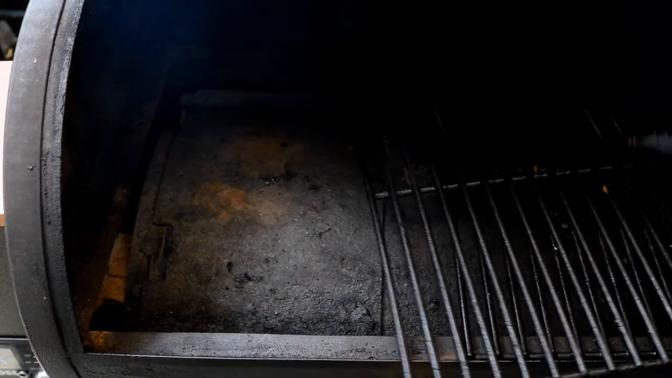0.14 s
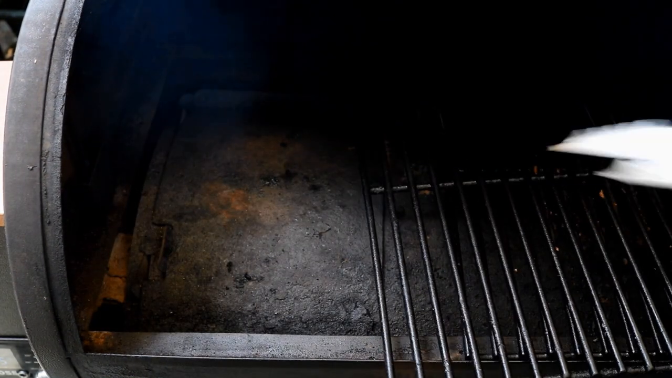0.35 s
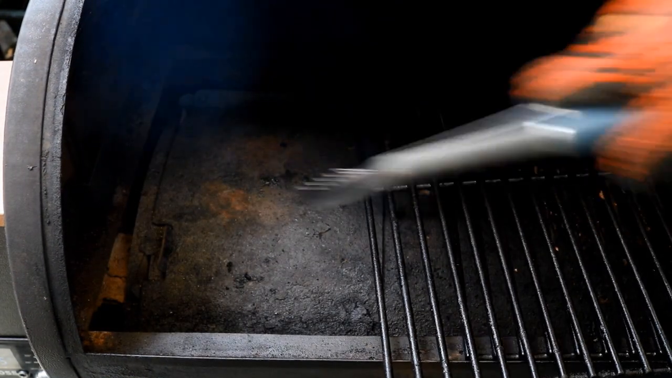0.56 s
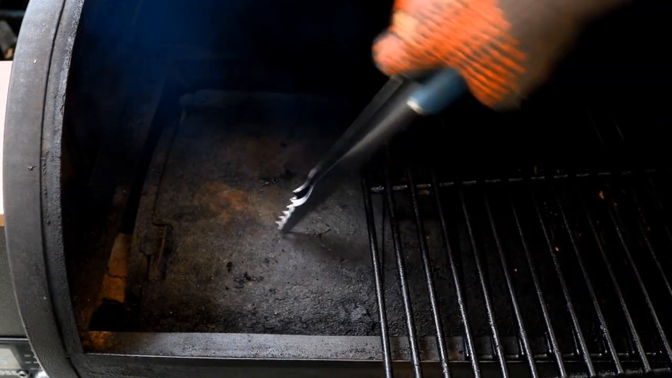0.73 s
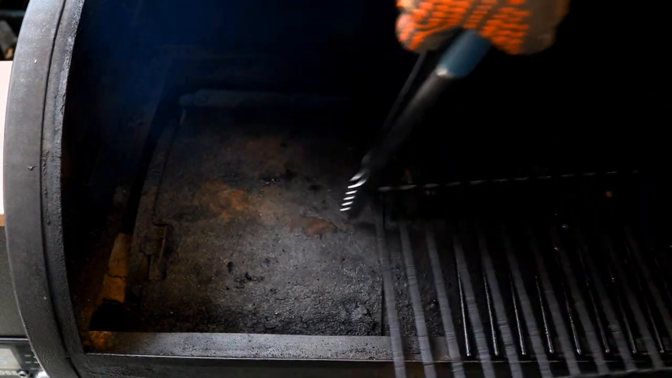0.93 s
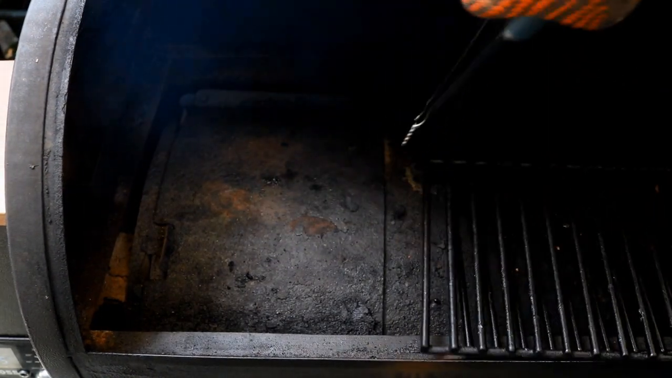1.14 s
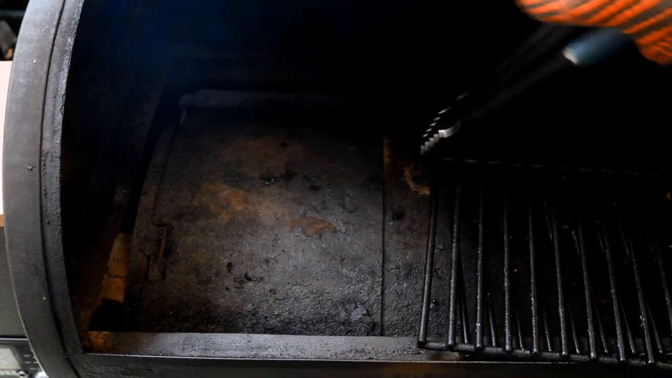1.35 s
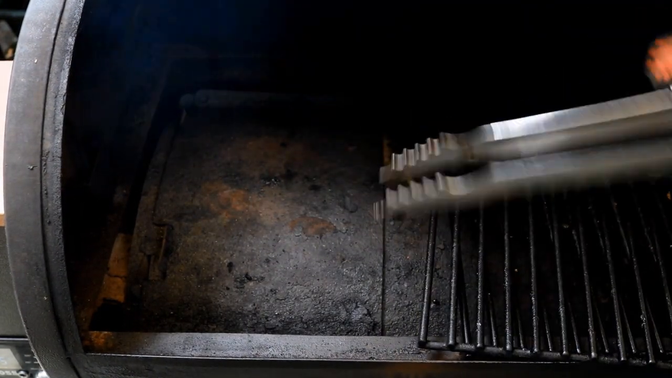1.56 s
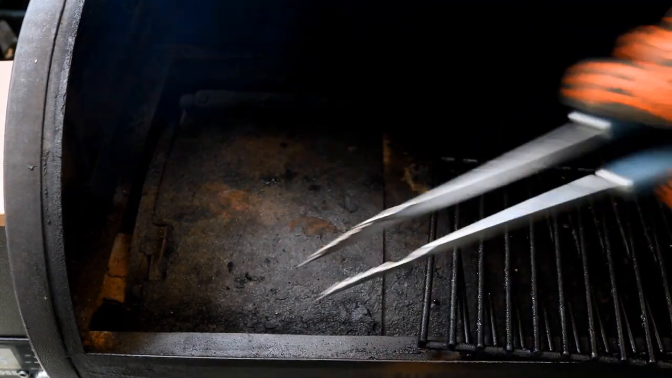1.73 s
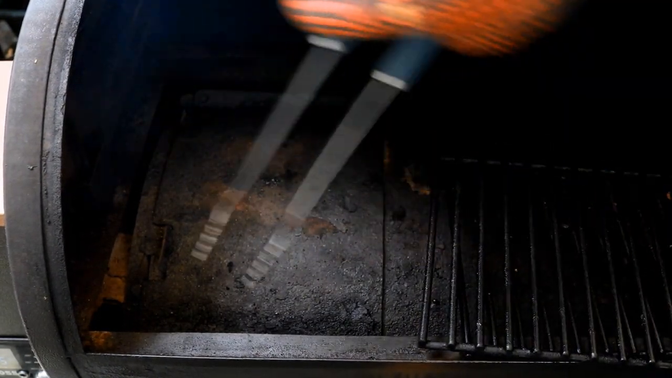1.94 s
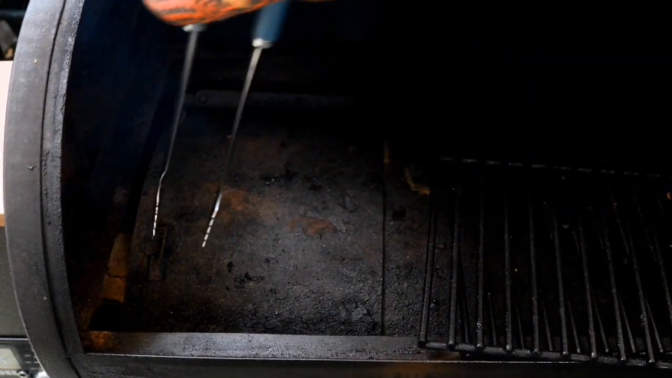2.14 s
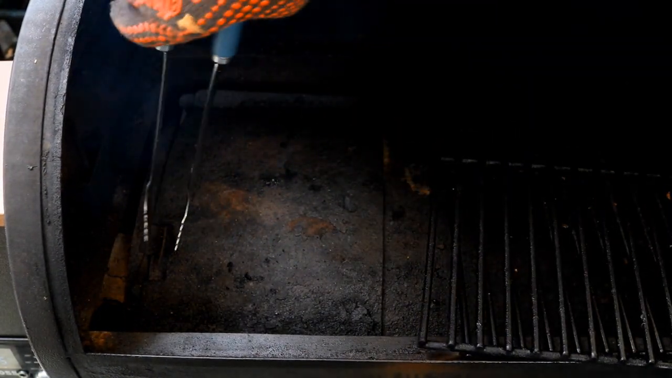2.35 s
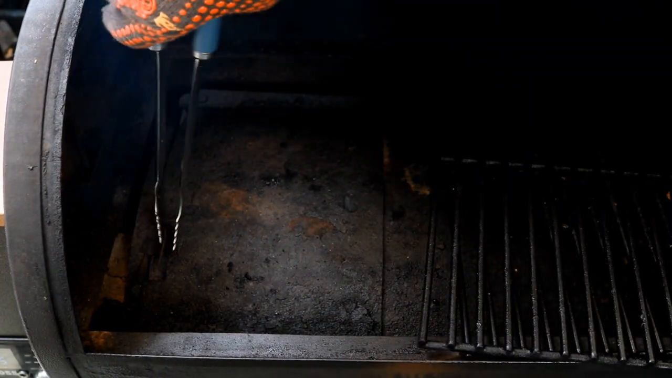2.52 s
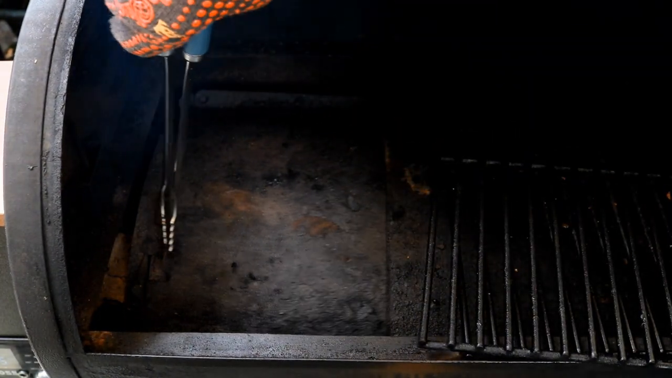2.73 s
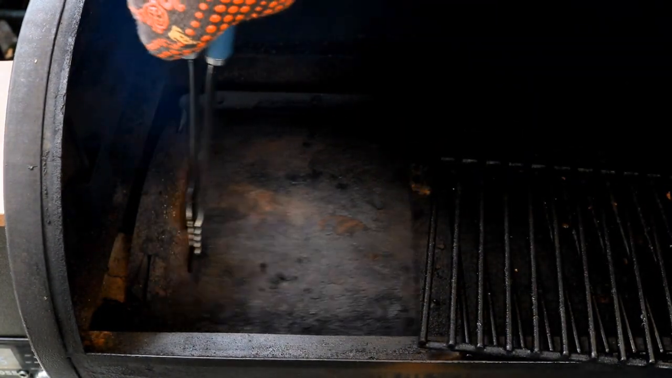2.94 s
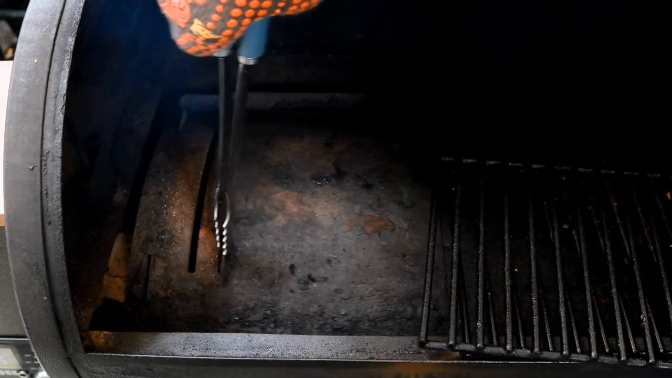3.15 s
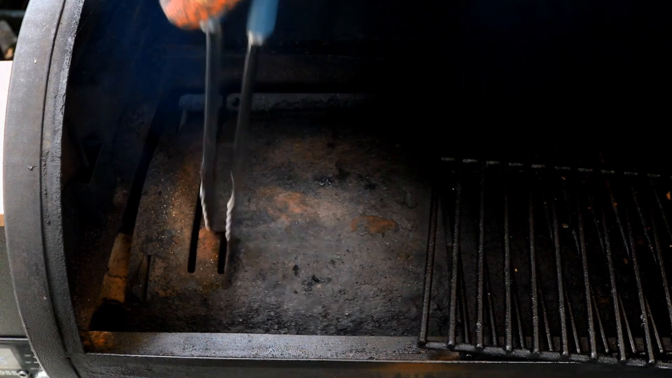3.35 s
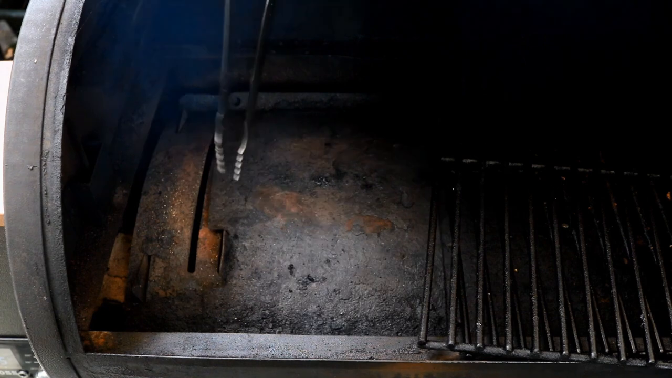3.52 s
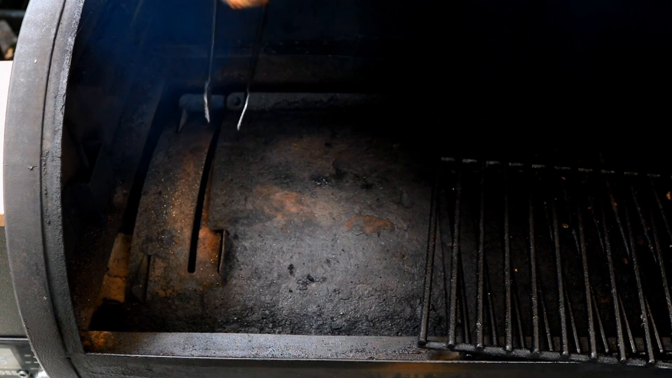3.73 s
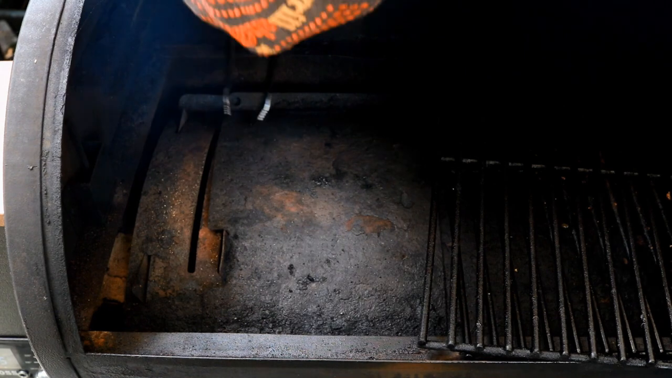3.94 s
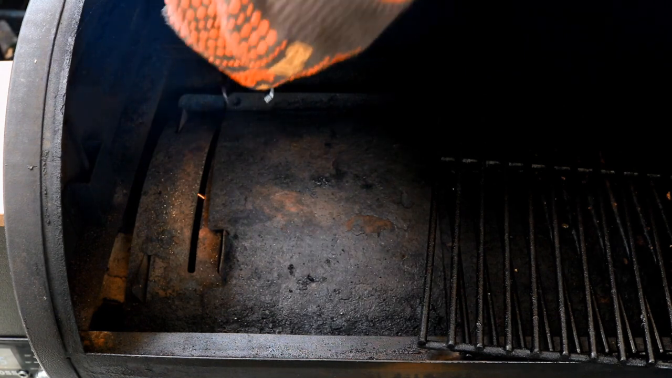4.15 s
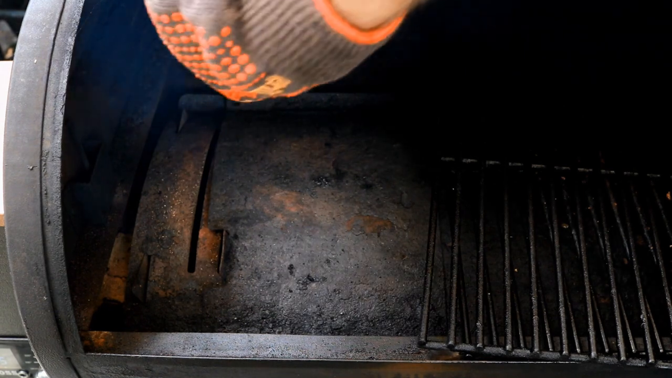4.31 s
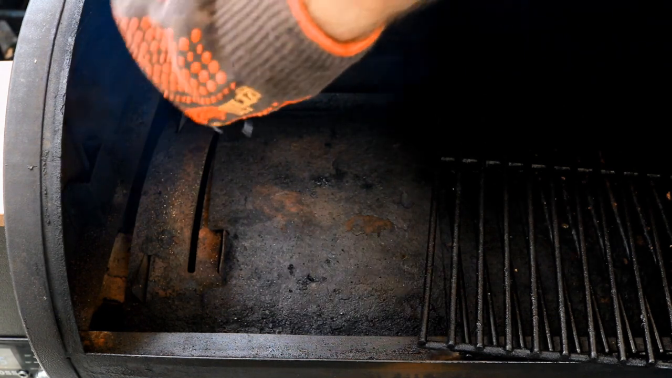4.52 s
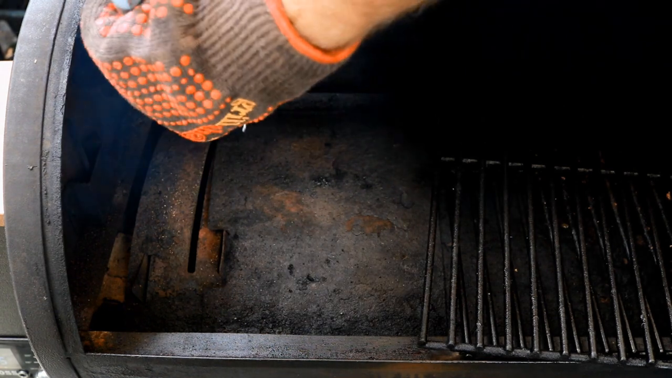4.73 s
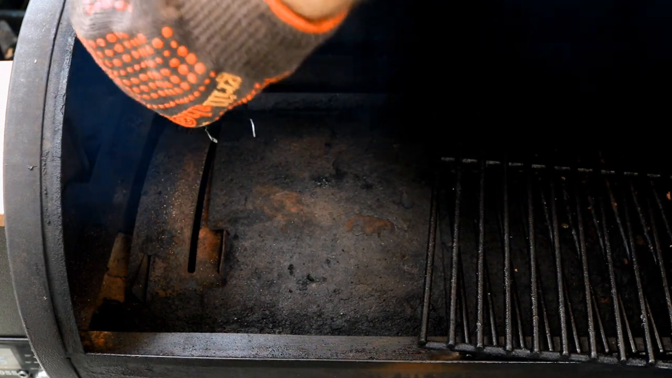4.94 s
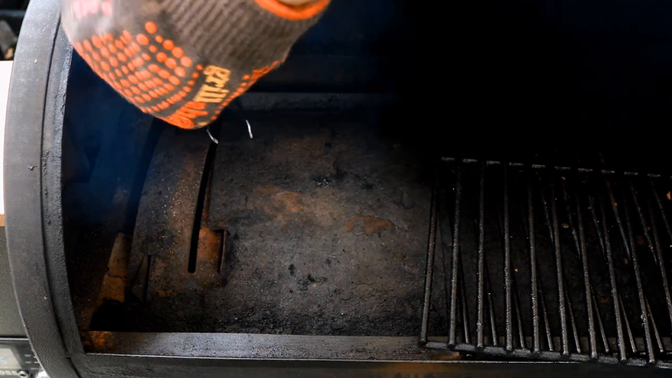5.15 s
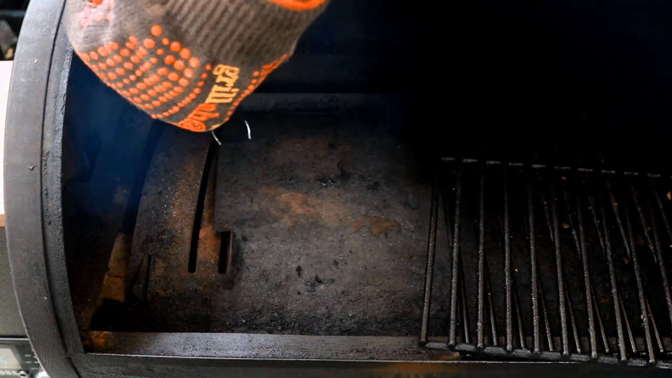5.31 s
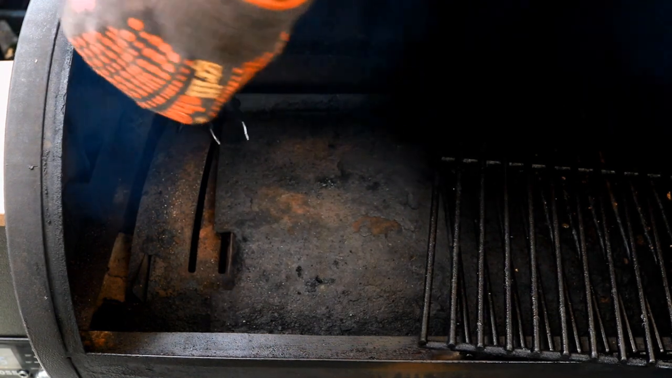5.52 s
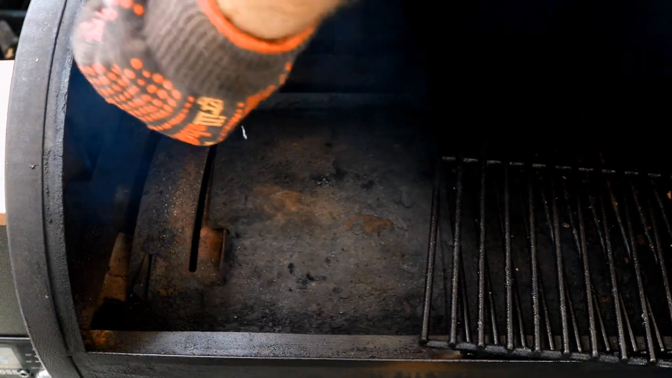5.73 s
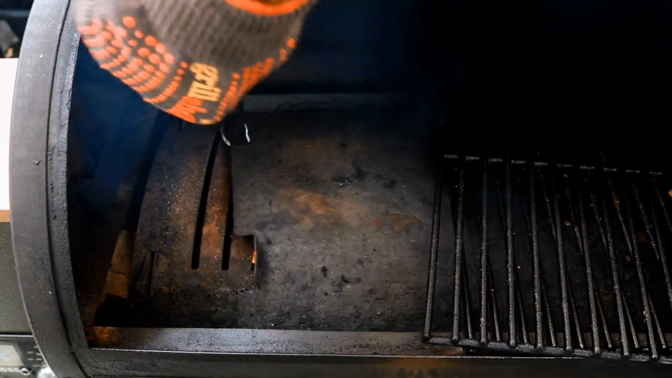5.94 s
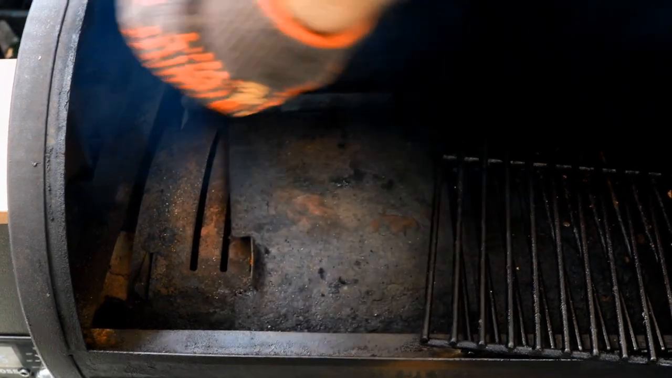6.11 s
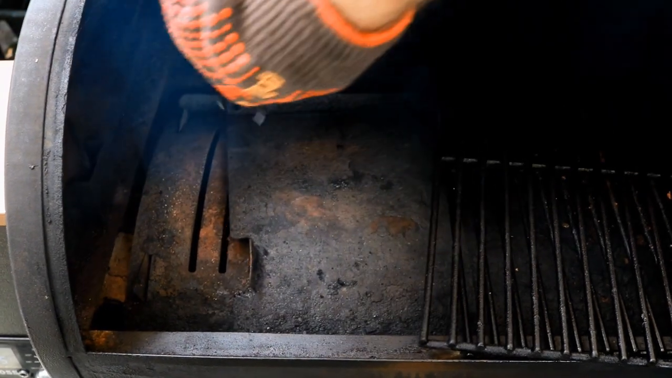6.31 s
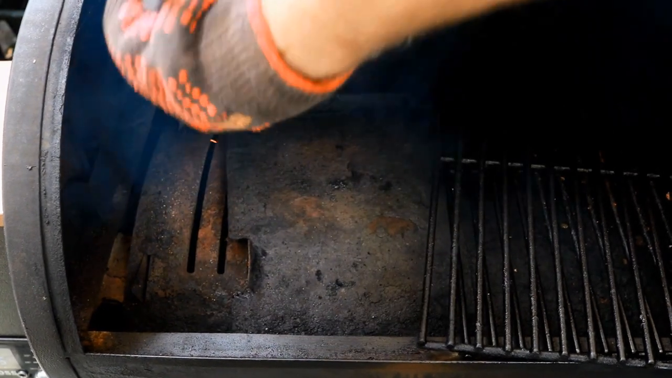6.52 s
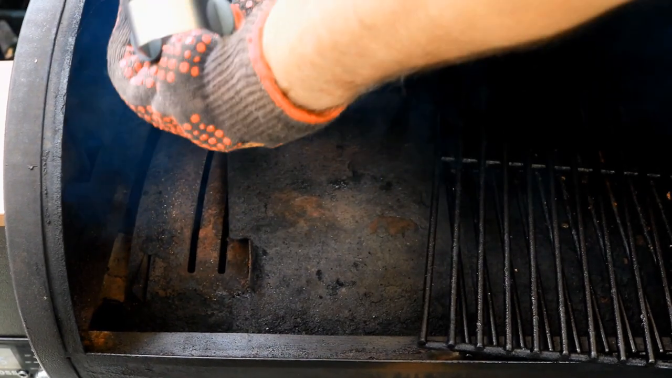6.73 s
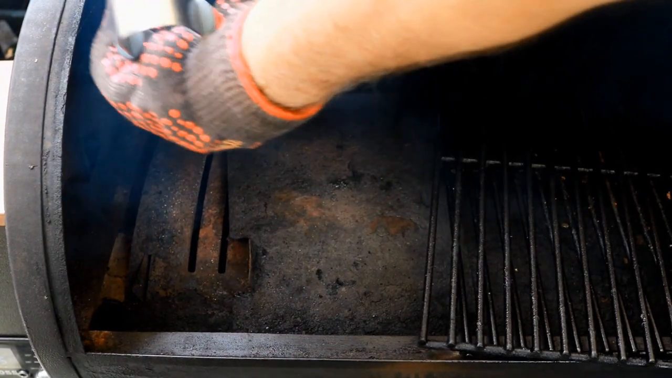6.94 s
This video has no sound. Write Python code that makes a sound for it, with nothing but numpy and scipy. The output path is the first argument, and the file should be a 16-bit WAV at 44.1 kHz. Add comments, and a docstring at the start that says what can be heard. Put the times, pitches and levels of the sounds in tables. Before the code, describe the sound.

Heavy grill grate rattles and clangs in a metal barrel, followed by faint gritty scrapes and small metallic clicks above a constant fan roar.

```python
"""Steel grate and slide plate in a barrel grill

Tongs drag a steel grate aside, let it drop, then scrape a slide plate open, over a steady fan roar.
Fan: shaped noise and fuzzy tones. Blows: rough contacts that ring rods or plate, and boom in the barrel.
Scrapes: grains of ash that fizz and shake the barrel, with small clinks of sliding steel.
A small two-port microphone with gain control is close by.
"""
import sys
import numpy as np
from scipy import signal
from scipy.fft import rfft, irfft
from scipy.io import wavfile
from scipy.ndimage import uniform_filter1d, minimum_filter1d

SR = 44100
rng = np.random.default_rng(int(sys.argv[2]) if len(sys.argv) > 2 else 0)


def to_wav(s):
    """Save 16-bit WAV."""
    ch = np.atleast_2d(s).T  # columns
    pcm = np.round(np.clip(ch, -1, 1) * 32767)  # PCM
    wavfile.write(sys.argv[1], SR, pcm.astype(np.int16))


N = 311787  # length in samples

# Blows on the grate, dragged and then dropped: (time [s], rods [dB], barrel [dB], grit [dB],
# rods centre [Hz], barrel centre [Hz], boom against the barrel [dB], barrel reach [octaves])
GRATE_BLOWS = [(.0074, -23, -22, -45.5, 2170, 690, -2, 1.1), (0.0506, -30, -24, -48, 2300, 900, 10, 1.3),
               (.061, -31, -17, -55, 3400, 630, -5, 1.6), (.0723, -27.5, -15, -42.5, 4800, 686, 8, 0.99),
               (.088, -33, -24, -59, 3400, 380, 12.5, 0.8), (.111, -37, -18.5, -64, 2980, 620, 3.5, 0.58),
               (.1524, -28, -17, -48, 2090, 793, 5.5, 0.49), (.174, -34.5, -19, -67, 3600, 635, -3, 0.71),
               (0.189, -32.5, -45, -57, 2140, 600, 2.5, 1.1),
               (0.2193, -31, -21.5, -45, 2500, 654, 11, 0.92),
               (0.2672, -22, -26, -35.5, 2400, 1340, -0.5, 1.2), (.285, -32, -22, -57, 3980, 610, 7, 0.9),
               (0.355, -36, -21, -33.5, 2590, 366, 8, 1.5),
               (0.377, -9.5, -2.5, -28.5, 4870, 857, -2.5, 0.5),
               (0.3923, -8.5, -4.5, -40, 3020, 678, 1, 2.3),
               (0.4186, -17, -2.5, -38, 2560, 704, 10.5, 0.79),
               (0.4636, -27.5, -10, -49, 3400, 580, 12.5, 0.75),
               (.4915, -14, -3.5, -35, 3400, 756, 9, 0.79), (.4994, -18, -4.5, -36, 3000, 870, 1, 0.68),
               (0.52, -19, -11, -45, 1940, 880, -3.5, 0.53), (.5594, -29, -12.5, -43.5, 3560, 650, 7.5, .9),
               (0.9324, -47, -45, -50.5, 2260, 407, 8, 1.2), (1.0652, -28.5, -18, -47, 1760, 780, 10, 0.61),
               (1.072, -36.5, -28, -58, 3660, 544, -8, .7), (1.1658, -52, -48, -50.5, 3600, 899, 5, 1.2),
               (1.1942, -51, -25, -46.5, 4400, 536, 8, 0.66), (1.212, -39, -25.5, -50, 3080, 690, 18, 0.7),
               (1.2185, -35, -28.5, -55, 3080, 804, -7, 1.1), (1.231, -42, -24.5, -57, 3430, 550, 11, 1),
               (1.24, -36, -25.5, -55, 2420, 1000, 4, 1.6), (1.251, -44, -28, -42.5, 2400, 555, 3, 0.99),
               (1.386, -44, -14, -55, 2000, 710, 9, 0.71), (1.41, -41, -17.5, -67, 2120, 381, 3, 1.7),
               (1.4617, -28, -13.5, -50, 3600, 560, 13, 2.9), (1.478, -16.5, -9, -41.5, 2500, 584, -1, 1.6),
               (1.486, -14, -10.5, -36, 2980, 402, 10.5, 0.44),
               (1.5094, -31, -15, -43, 2160, 404, 9.5, 0.93),
               (1.5296, -24, -12.5, -46, 1830, 1000, 8.5, 0.44), (1.5939, -30, -14, -46, 2000, 540, 4, 2.7),
               (1.6, -40, -12.5, -60, 1400, 404, 1, 0.52), (1.62, -54, -21, -67, 1800, 413, 8, 0.87),
               (1.6754, -48, -14, -71, 2100, 541, 7.5, 0.67), (1.683, -57, -18.5, -74, 2090, 404, -5, 0.89),
               (1.71, -51, -30.5, -82, 1800, 730, 2, 0.63), (1.7426, -45, -26, -77, 3080, 413, 6, 0.66)]
# Tongs tap the slide plate: (time [s], plate [dB], barrel [dB], grit [dB],
# plate centre [Hz], barrel centre [Hz], barrel reach [octaves])
PLATE_TAPS = [(2.647, -60, -48, -50.5, 2800, 700, 1.2), (2.9611, -40, -43, -49.5, 2300, 400, 1.2),
              (3.0937, -36, -31, -44.5, 2800, 1340, .3), (3.096, -45, -55, -59, 5700, 1340, .3),
              (3.436, -37, -40, -48, 2170, 388, .8), (3.62, -45, -46, -58, 2320, 390, 1.2),
              (3.781, -39.5, -47, -50, 3280, 708, 1.2), (3.812, -40, -43, -52, 3280, 511, 1.2),
              (4.9343, -59, -52, -55, 3220, 470, 1.2), (5.0722, -38, -23.5, -52, 1740, 760, 0.4),
              (5.077, -57, -20, -64, 3000, 370, .6), (5.09, -57, -33, -55, 1740, 905, .6),
              (5.1729, -52, -50, -49.5, 2870, 583, 1.2), (5.1923, -40, -49, -50, 1740, 394, .8),
              (5.198, -38, -50, -56, 5600, 390, 1.2), (5.216, -38, -45, -50, 2800, 540, .8),
              (5.226, -57, -31, -64, 2800, 560, .9), (5.2802, -54, -42, -52.5, 2420, 404, 1.2),
              (5.338, -47, -58, -56, 2700, 398, 1.2), (5.3983, -52, -66, -58, 2660, 382, 1.2),
              (5.5436, -61, -41, -53.5, 2320, 1190, 1.2), (5.585, -48, -52, -47.5, 2930, 579, 1.2),
              (5.643, -35, -37, -47.5, 2000, 382, .8), (5.664, -49, -50, -50, 2900, 560, 1.2),
              (5.9214, -51, -53, -49, 2300, 458, 1.2), (6.038, -48, -38, -54, 2500, 388, .8),
              (6.0901, -46, -37, -65, 2400, 384, .8), (6.2232, -39, -37, -62, 2180, 383, 1.2),
              (6.257, -27, -25, -42.5, 3140, 1220, .9), (6.2645, -26.5, -25.5, -45, 2480, 640, 1.2),
              (6.319, -44, -41, -57, 2800, 603, 1.2), (6.3948, -48, -37, -56, 3300, 600, 1.2),
              (6.425, -31.5, -28.5, -43, 2300, 1220, 1.2), (6.4448, -35.5, -33, -40, 4350, 1200, .7)]
# Ringing modes of the grate rods, before the ring factor:
# (frequency [Hz], relative level [dB], time to fall 60 dB [s])
ROD_MODES = [(1360, -6, 0.074), (1740, 1, 0.11), (2040, -5.5, 0.11), (2400, -1.5, 0.051),
             (2620, -5.5, 0.14), (3080, 2, 0.048), (3430, -2.5, 0.12), (3590, 3, 0.064), (3980, -5, 0.15),
             (4500, -5, 0.046), (4820, -5.5, 0.041), (5450, -23, 0.085), (5200, -8, 0.079),
             (5450, 7.5, 0.1), (6700, -3.5, 0.11)]
# Ringing modes of the slide plate, before the ring factor:
# (frequency [Hz], relative level [dB], time to fall 60 dB [s])
PLATE_MODES = [(1420, 15, 0.081), (1740, 10, 0.065), (2000, -3, 0.12), (2300, 9.5, 0.19),
               (2480, 10.5, 0.12), (2800, 10, 0.1), (3080, 2, 0.12), (3280, 10.5, 0.093), (3600, 7, 0.14),
               (4350, -17, .1), (5100, -3, 0.07), (5600, -2, 0.093), (6760, -4, .1)]
# Ringing modes of the barrel, before the ring factor:
# (frequency [Hz], relative level [dB], time to fall 60 dB [s])
BARREL_MODES = [(137.5, 4, 0.54), (158.4, 6, 0.52), (180.8, 7, 0.29), (240.4, 4.5, 0.18), (310, 6, .12),
                (352, -3.5, 0.13), (381, 5.5, 0.24), (404, 5, 0.48), (464, -3, 0.18), (541, 6, 0.33),
                (580, 4.5, 0.19), (607, 8.5, 0.17), (689, 10.5, 0.053), (725, -3, 0.53), (773, 13.5, 0.04),
                (852, -3.5, 0.19), (905, -8, 0.28), (1000, -2, 0.28), (1120, -17, 0.099), (1200, 7.5, 0.13),
                (1294, 5, 0.11), (1340, -5, 0.14), (1560, 12, 0.11)]


def amp(db):
    """Turns decibels into a plain factor."""
    return 10 ** (np.asarray(db) / 20)


def evened(x):
    """Scales a signal to an average (RMS) level of 1."""
    return x / np.sqrt(np.mean(x ** 2) + 1e-20)


def read(points, hz):
    """Reads a curve of (frequency, value) points, joined by straight lines over log frequency."""
    f, value = np.transpose(points)
    return np.interp(np.log(hz + 1), np.log(f + 1), value)


def coloured(x, points):
    """Shapes x by a spectrum in dB."""
    gain = amp(read(points, np.fft.rfftfreq(len(x), 1 / SR)))
    return irfft(rfft(x) * gain, len(x))


def fan():
    """Air roar with a slow flutter, and fuzzy tones from the blades and the duct."""
    # colour of the air roar: (frequency [Hz], relative level [dB per Hz])
    roar_colour = [(12, -63), (20, -34.5), (45, -26.5), (123, -12), (167, 0), (300, -15), (359, -12),
                   (408, -24), (452, -21), (974, -28), (1160, -25), (1430, -32.5), (1670, -38), (3970, -50),
                   (9000, -76.5), (11700, -103), (19800, -120)]
    # tones from the blades and the duct: (frequency [Hz], width at half height [Hz], level [dB])
    tones = [(175, 84, -61), (239.05, 2.8, -44.5), (564, 57, -54.5), (1150, 78, -55.5), (1411, 120, -58.5)]
    roar_db, flutter_db = -34.5, 1.0
    roar_noise, flutter_noise, tone_noise = rng.standard_normal((3, N))
    flutter = evened(uniform_filter1d(uniform_filter1d(flutter_noise, 3000), 3000))
    out = amp(roar_db + flutter_db * flutter) * evened(coloured(roar_noise, roar_colour))
    hz, spectrum = np.fft.rfftfreq(N, 1 / SR), rfft(tone_noise)
    for tone_hz, width_hz, db in tones:
        peak = 1 / (1 + (2 * (hz - tone_hz) / width_hz) ** 2)
        out += amp(db) * evened(irfft(spectrum * peak, N))
    return out


def ring(modes, push, centre_hz, stretch, reach, detune, dense_db, boom_db=-4):
    """A push excites the modes near a centre (reach in octaves), over a dense mass of small modes; peak 1."""
    boom_db_per_octave = 4.5  # blows high on the shell boom less
    t, out = np.arange(len(push)) / SR, np.zeros(len(push))
    for (hz, db, t60), (chance, shift, side) in zip(modes, rng.standard_normal((len(modes), 3))):
        turn = 2 * np.pi * hz * (1 + detune * shift) / SR  # angle per sample
        shrink = amp(-60 / (t60 * stretch * SR))  # decay per sample
        octaves = np.log2(hz / centre_hz)
        # the mode that swings most at the struck spot stands out
        db = db + 8 * np.exp(-(octaves / 0.11) ** 2)
        if hz > 260:
            db = db - 8 * (octaves / reach) ** 2
        else:
            db = db + boom_db + boom_db_per_octave * octaves
        db = db + 2.5 * chance
        # each mode starts inward or outward, by its shape at the struck spot
        strength = np.sign(side) * amp(db) * np.sin(turn)
        out += signal.lfilter([strength], [1, -2 * shrink * np.cos(turn), shrink ** 2], push)
    hz = np.fft.rfftfreq(len(t), 1 / SR)
    near = amp(-8 * (np.log2((hz + 1) / centre_hz) / reach) ** 2)
    dense = evened(irfft(rfft(rng.standard_normal(len(t))) * near, len(t)))
    dense = dense * amp(-60 * t / (0.11 * stretch))
    dense = signal.oaconvolve(dense, push[:2000])[:len(t)]
    out = out / abs(out).max() + amp(dense_db) * dense / abs(dense).max()
    return out / abs(out).max()


def clinks(grit):
    """Sliding steel touches down here and there: small taps, each ringing the rods or the plate at one spot."""
    # where on the steel the taps land: centre of the ringing [Hz]
    spots_hz = [1800, 2500, 3400, 5100]
    clinks_per_s, spread_db, ring_factor = 400, 8, 0.36
    rod_db, plate_db = 0, -8  # against the grit
    grate_rests_s = 2.2  # from here on only the plate clinks
    size = amp(spread_db * np.minimum(rng.exponential(1, N), 4))
    size = size * (rng.random(N) < clinks_per_s / SR)
    size = grit * evened(size)
    spot = rng.integers(0, len(spots_hz), N)
    early, out = np.arange(N) < grate_rests_s * SR, np.zeros(N)
    push = np.diff(signal.windows.hann(5), append=np.zeros(6144))
    for modes, db, moving in ((ROD_MODES, rod_db, early), (PLATE_MODES, plate_db, ~early)):
        for k, hz in enumerate(spots_hz):
            tap = ring(modes, push, hz, ring_factor, reach=1.0, detune=0.0027, dense_db=-16)
            tap = amp(db) * tap / np.linalg.norm(tap)
            out += signal.oaconvolve(size * moving * (spot == k), tap)[:N]
    return out


def stirring(t):
    """When the ash moves: (grit level, rumble level, barrel centre Hz) for each stroke and around each blow."""
    # strokes of steel over steel: (start [s], strongest [s], end [s], grit [dB], rumble [dB],
    # barrel centre [Hz])
    stroke_table = [(0.032, 0.072, .14, -43.5, -27.5, 700), (0.112, 0.29, .36, -49, -29, 685),
                    (0.366, 0.495, .63, -42.5, -28.5, 685), (1.153, 1.18, 1.19, -54, -63, 650),
                    (1.204, 1.218, 1.226, -48, -28, 685), (1.232, 1.234, 1.31, -47, -48, 636),
                    (1.26, 1.402, 1.47, -59, -45.5, 550), (1.437, 1.51, 1.57, -42.5, -18, 463),
                    (1.55, 1.579, 1.76, -68, -28, 398), (1.755, 1.765, 1.87, -54.5, -44.5, 570),
                    (2.5, 2.693, 2.88, -51.5, -80, 600), (2.897, 2.918, 3.01, -65, -68, 600),
                    (3.07, 3.197, 3.4, -54, -45.5, 540), (3.24, 3.35, 3.5, -52.5, -57, 530),
                    (3.38, 3.443, 3.49, -47, -39.5, 536), (3.48, 3.51, 3.55, -61.5, -52, 540),
                    (3.55, 3.584, 3.7, -60, -49, 540), (3.723, 3.8, 3.9, -55, -53, 540),
                    (5.138, 5.22, 5.27, -57.5, -41, 580), (5.237, 5.31, 5.43, -65, -51, 580),
                    (5.43, 5.478, 5.53, -66.5, -71, 580), (5.542, 5.636, 5.75, -58.5, -46, 580),
                    (5.928, 6.086, 6.13, -54, -69, 540), (6.134, 6.22, 6.31, -56.5, -52, 544),
                    (6.278, 6.32, 6.38, -55, -48, 540), (6.35, 6.436, 6.55, -60, -59, 540)]
    fade_db, flatness = -28.5, 2.5  # level at both ends of a stroke; how long it holds near its top
    skid_db, skid_db_per_s = -10, 603  # grit swells as the steel slides into a blow
    # ash thrown up by a blow, then settling; the after-rumble is set against the barrel level
    jolt_s, grit_fall_db_per_s, shake_fall_db_per_s, shake_db = 0.0006, 509.5, 258.5, -16
    for start, top, end, grit_db, rumble_db, barrel_hz in stroke_table:
        away = np.maximum((top - t) / (top - start), (t - top) / (end - top))
        shape = amp(fade_db * np.minimum(away, 3) ** flatness)
        yield amp(grit_db) * shape, amp(rumble_db) * shape, barrel_hz
    for s, _, barrel_db, grit_db, _, barrel_hz, *_ in GRATE_BLOWS + PLATE_TAPS:
        after = np.maximum(t - s, 0)
        jolt = np.minimum(after / jolt_s, 1)
        skid = (1 - jolt) * amp(skid_db - skid_db_per_s * np.maximum(s - t, 0))
        grit = (jolt + skid) * amp(grit_db - grit_fall_db_per_s * after)
        rumble = jolt * amp(barrel_db + shake_db - shake_fall_db_per_s * after)
        yield grit, rumble, barrel_hz


def strokes():
    """Grains of ash catch under the steel: a fizz, a rumble of the barrel that they shake, and clinks."""
    # colour of the fizz: (frequency [Hz], relative level [dB per Hz])
    grit_colour = [(880, -10), (1500, -0.5), (1870, -0.5), (2940, -3.5), (4200, -7), (5710, -7.5),
                   (6430, -11), (11800, -15), (16000, -26)]
    grains_per_s, grain_spread_db = 9000, -0.5
    rim_hz, belly_hz = 773, 411  # where the barrel rumbles, high and low
    # the low shell rings longer and booms
    rim_ring, belly_ring, rim_boom_db, belly_boom_db = 0.26, 0.36, -4, 4.5
    t, power = np.arange(0, N / SR, 1 / 2000), 0  # levels are drawn 2000 times a second
    for grit, rumble, barrel_hz in stirring(t):
        depth = np.clip(np.log(rim_hz / barrel_hz) / np.log(rim_hz / belly_hz), 0, 1)
        power = power + np.array([grit ** 2, (1 - depth) * rumble ** 2, depth * rumble ** 2])
    grit, rim, belly = (np.interp(np.arange(N) / SR, t, np.sqrt(row)) for row in power)
    size = amp(grain_spread_db * np.minimum(rng.exponential(1, N), 4)) * rng.standard_normal(N)
    grains = size * (rng.random(N) < grains_per_s / SR)
    out = grit * evened(coloured(grains, grit_colour))
    push = np.diff(signal.windows.hann(16), append=np.zeros(8192))
    for level, centre_hz, stretch, boom_db in ((rim, rim_hz, rim_ring, rim_boom_db),
                                               (belly, belly_hz, belly_ring, belly_boom_db)):
        body = ring(BARREL_MODES, push, centre_hz, stretch, reach=0.95, detune=0,
                    dense_db=0.5, boom_db=boom_db)
        out += level * evened(signal.oaconvolve(grains, body)[:N])
    return out + clinks(grit)


def blows(table, modes, dense_db, stretch, shell_ring, contact_s):
    """Each blow is a short rough contact: a tick, the ring of the struck steel and the boom of the barrel."""
    tick_rise_s, tick_fall_s, contact_rise_s = 0.00041, 0.0069, 0.0017
    # the tick of a blow with firm grit; it grows faster than the grit
    firm_grit_db, firm_tick_db, tick_growth = -35, -28.5, 1.72
    out, t = np.zeros(N + SR), np.arange(12288) / SR
    tick_band = signal.butter(2, 6000, "highpass", fs=SR, output="sos")
    light = signal.butter(2, [1200, 9000], "bandpass", fs=SR, output="sos")
    heavy = signal.butter(2, [110, 2200], "bandpass", fs=SR, output="sos")
    for s, steel_db, barrel_db, grit_db, steel_hz, barrel_hz, boom_db, reach in table:
        chatter, tick_noise = rng.standard_normal((2, len(t)))
        blow = signal.unit_impulse(len(t))
        chatter = chatter * (1 - np.exp(-t / contact_rise_s)) * np.exp(-t / contact_s)
        chatter = chatter / np.linalg.norm(chatter)
        # a quick fall with a faint, longer tail
        fade = np.exp(-t / tick_fall_s) + amp(-30.5 - 60 * t / (0.079 * stretch))
        fade = (1 - np.exp(-t / tick_rise_s)) * fade
        tick_db = firm_tick_db + tick_growth * (grit_db - firm_grit_db)
        tick = amp(tick_db) * evened(signal.sosfilt(tick_band, tick_noise)) * fade
        # thin steel follows the chatter of the contact; the heavy shell feels mostly the blow itself
        push = signal.sosfilt(light, 0.8 * blow + chatter)
        steel = ring(modes, push, steel_hz, stretch, reach=0.98, detune=0.0075, dense_db=dense_db)
        push = signal.sosfilt(heavy, blow + 0.3 * chatter)
        shell = ring(BARREL_MODES, push, barrel_hz, shell_ring, reach, detune=0.006,
                     dense_db=-7.5, boom_db=boom_db)
        sound = tick + amp(steel_db) * steel + amp(barrel_db) * shell
        out[round(s * SR):][:len(t)] += sound * np.minimum((t[-1] - t) / .05, 1)
    return out[:N]


def ports(x, balance, apart, echo_s):
    """Two microphone ports: a level step by frequency, plus reflections that differ between them."""
    hz, spectrum = np.fft.rfftfreq(N, 1 / SR), rfft(x)
    lean = np.tanh(np.log(amp(read(balance, hz))) / 2)
    # the reflections fall 60 dB in echo_s
    echo = rng.standard_normal(SR // 2) * amp(-60 * np.arange(SR // 2) / SR / echo_s)
    side = lean + rfft(echo / np.linalg.norm(echo), N) * amp(read(apart, hz))
    return irfft(spectrum * np.array([1 + side, 1 - side]), N)


def scene():
    """Fan and moving steel, each heard through the two ports."""
    # level step between the ports: (frequency [Hz], left minus right [dB])
    fan_balance = [(60, 0.0), (130, 0.0), (290, 0.0), (640, -1.0), (1410, -3.0), (3100, 0.0), (6820, 0.5),
                   (15000, 0.5)]
    steel_balance = [(250, 0), (600, -.4), (1300, -2.5), (2600, -4.6), (5500, -3.2), (10000, -1.5)]
    # share that is unlike at the two ports: (frequency [Hz], level [dB])
    fan_apart = [(30, -22.5), (60, -28), (110, -61), (200, -73.5), (380, -61.5), (700, -23), (1300, -21),
                 (2400, -20), (4400, -9.5), (8000, -2.5)]
    steel_apart = [(60, -23), (200, -70), (500, -61), (1500, -25), (4000, -29.5), (12000, -14.5)]
    # stretch and shell_ring multiply the ring times of the modes
    grate = blows(GRATE_BLOWS, ROD_MODES, dense_db=-2.0, stretch=0.74, shell_ring=0.83, contact_s=0.003)
    plate_boom_db = -4
    taps = [(*row[:-1], plate_boom_db, row[-1]) for row in PLATE_TAPS]
    plate = blows(taps, PLATE_MODES, dense_db=-6.0, stretch=0.32, shell_ring=0.53, contact_s=0.003)
    steel = grate + plate + strokes()
    return (ports(fan(), fan_balance, fan_apart, echo_s=.5)
            + ports(steel, steel_balance, steel_apart, echo_s=0.15))


def record(dry):
    """Gain control dips the whole sound around and after loud clanks, a limiter holds peaks, treble is cut."""
    threshold_db, share, fall_db_per_s = -28, .35, 14
    peak_limit, top_hz = .21, 15800
    power_db = 10 * np.log10(abs(uniform_filter1d((dry ** 2).mean(0), 2000)) + 1e-12)
    # the sensed level jumps up with a clank, then falls at a fixed rate
    fall = np.arange(N) * fall_db_per_s / SR
    sensed_db = np.maximum.accumulate(power_db + fall) - fall
    over_db = np.maximum(sensed_db - threshold_db, 0)
    # the gain drops by only a share of the excess
    ducked = dry / amp(share * uniform_filter1d(over_db, 2000))
    peak = -minimum_filter1d(-abs(ducked).max(0), size=131)
    held = ducked / np.maximum(uniform_filter1d(peak, size=131) / peak_limit, 1)
    lowpass = signal.firwin(511, top_hz, window=("kaiser", 9), fs=SR)
    return signal.oaconvolve(held, lowpass[None], "same")


dry = scene()
out = record(dry)
to_wav(out)
```